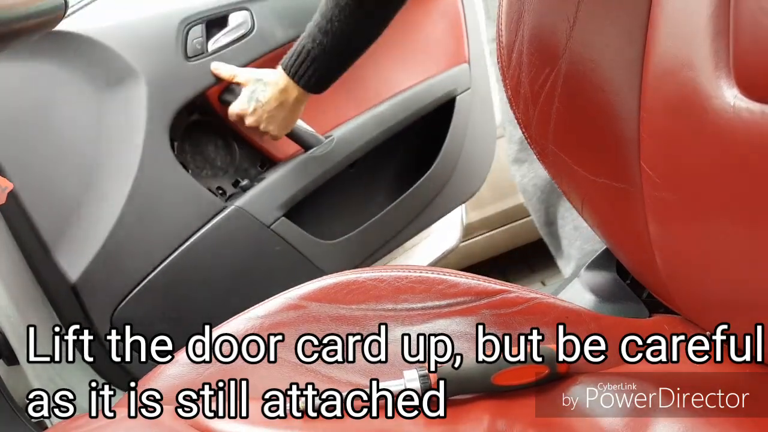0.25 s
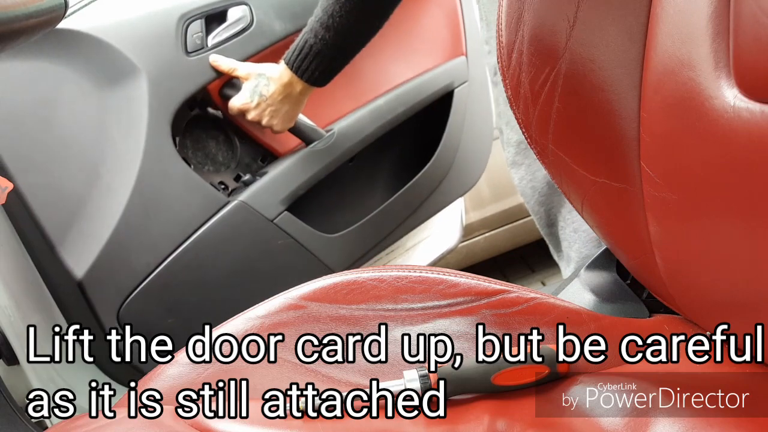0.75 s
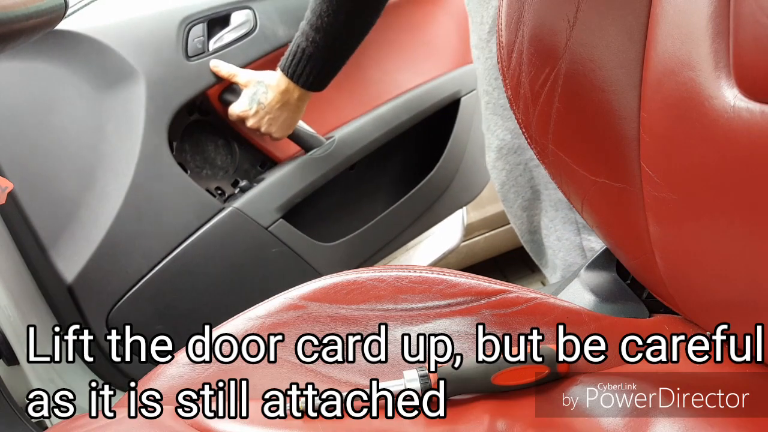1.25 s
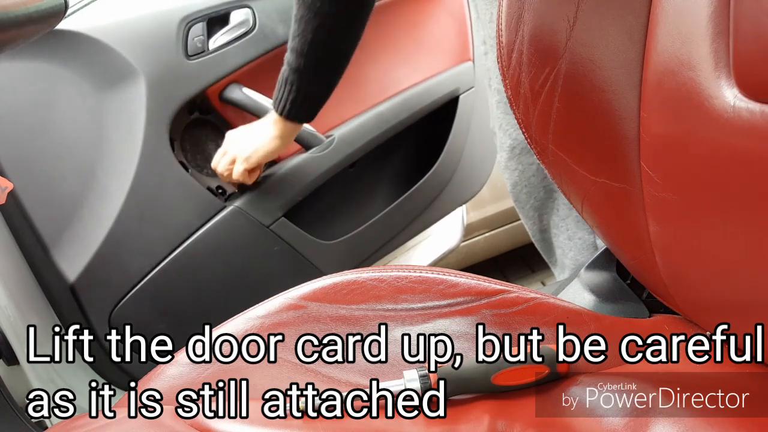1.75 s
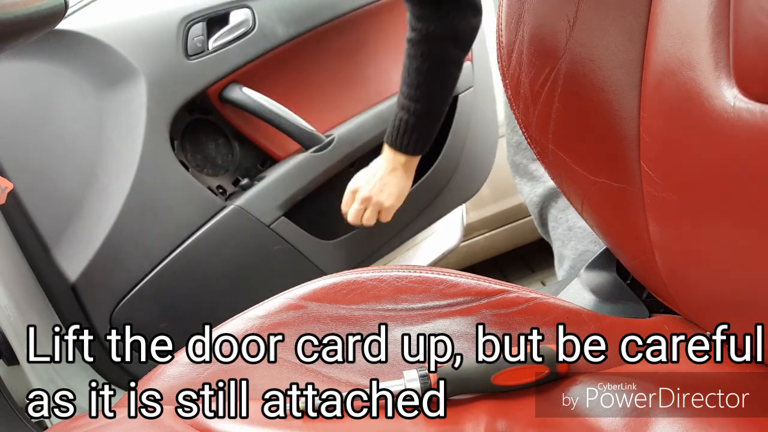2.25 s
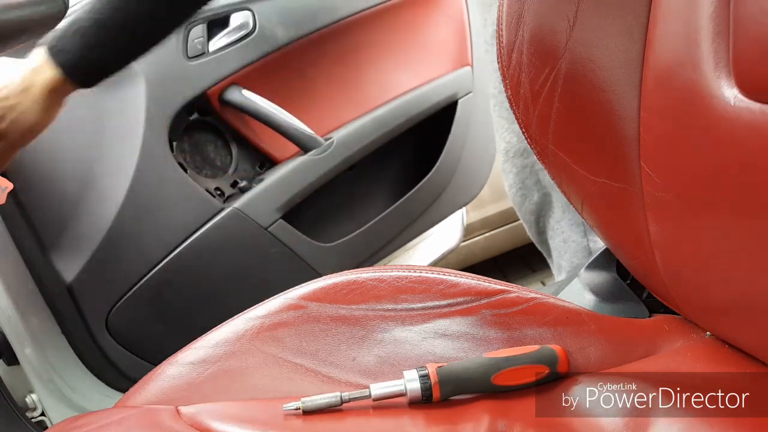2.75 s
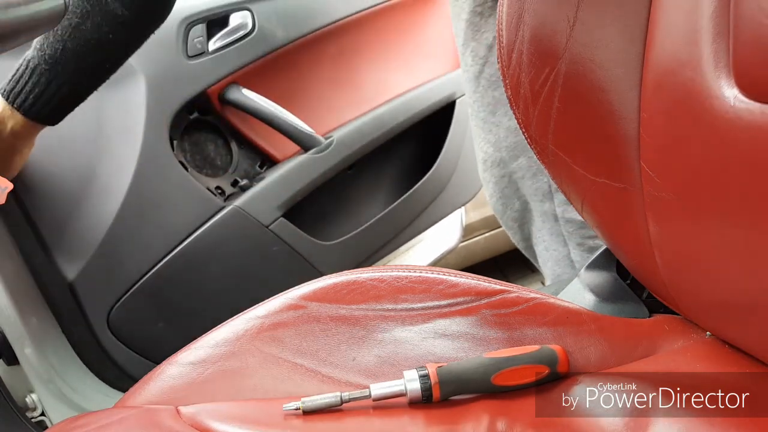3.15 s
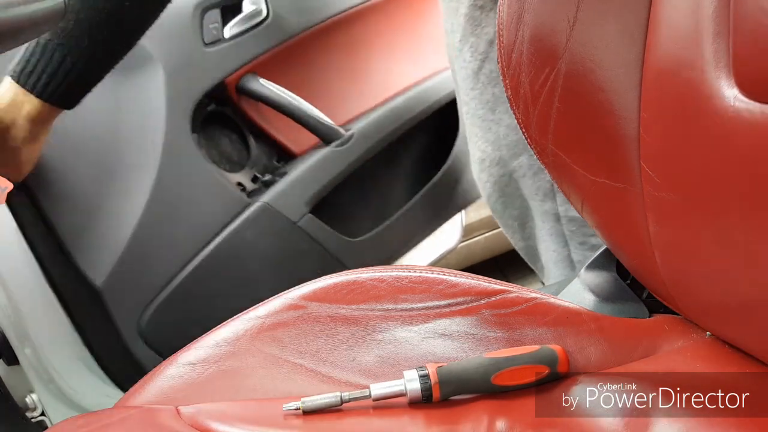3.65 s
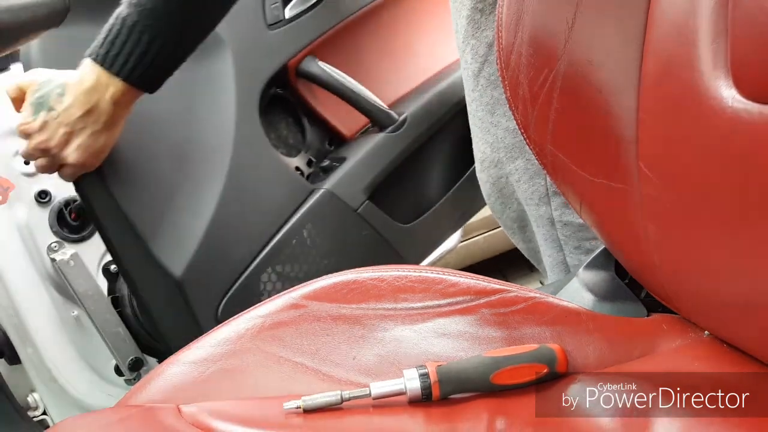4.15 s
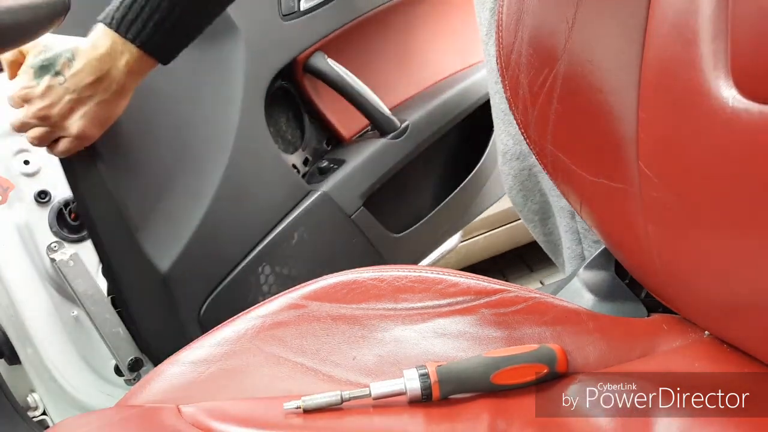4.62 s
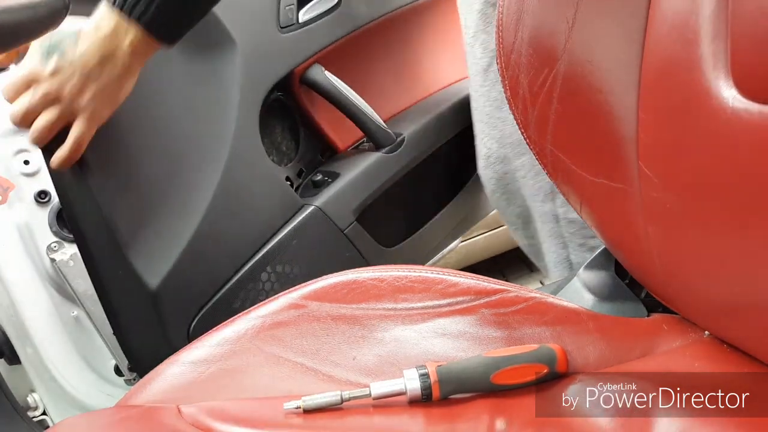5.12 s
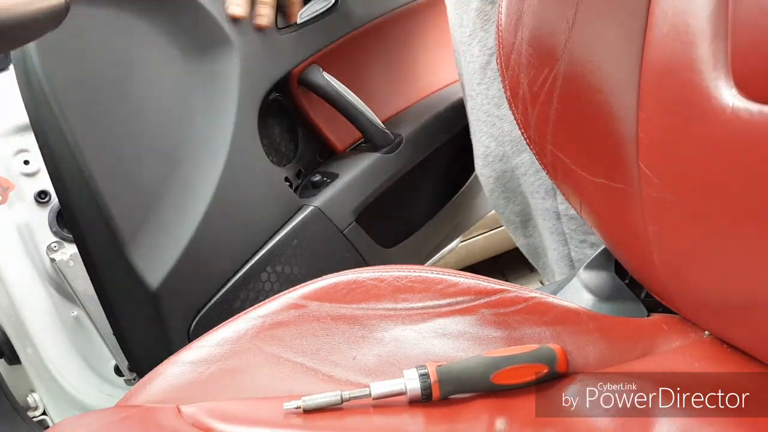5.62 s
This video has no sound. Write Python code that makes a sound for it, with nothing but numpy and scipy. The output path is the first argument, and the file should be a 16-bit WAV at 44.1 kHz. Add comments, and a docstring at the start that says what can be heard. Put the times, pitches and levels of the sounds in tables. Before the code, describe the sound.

Inside a car, a plastic door trim is worked free with busy clattering knocks, creaks and door thuds, then soft rubbing.

```python
"""Door card removal

A plastic door card is worked loose from a car door and lifted away, heard from the seat in the open cabin.
Clips snap and ping, edges knock and the hollow card rings: struck decaying modes with bursts of noise.
The steel door thuds in its lowest modes and sways as a low rumble; plastic creaks by stick-slip clicks.
A hand rubs the trim and distant road noise drifts in (banded noise); a faint narrow hiss comes late."""
import sys
import numpy as np
from scipy import signal
from scipy.fft import rfft, irfft
from scipy.io import wavfile

SR = 44100
rng = np.random.default_rng(int(sys.argv[2]) if len(sys.argv) > 2 else 0)


def elevation(decibels):
    """Turn decibel levels (scalar or array-like) into linear amplitude ratios."""
    levels = np.asarray(decibels, float)
    return 10 ** (levels / 20)


def store_pcm(level_fs):
    """Save levels as 16-bit WAV."""
    pcm = np.round(np.clip(level_fs, -1, 1) * 32767).astype(np.int16)
    wavfile.write(sys.argv[1], SR, np.atleast_2d(pcm).T)


N = 259295   # samples

# Blows on the card. Each row: start in seconds, card level in dB, card pitch in Hz, knock level in dB,
# snap level in dB.
BLOWS = [(0.009, -26.5, 360, -39.5, -85.5), (0.088, -15.5, 433, -16.5, -21.5),
         (0.101, -18.5, 476, -45, -57.5), (0.111, -31, 443, -25, -46.5), (0.17, -22, 423, -40, -44.5),
         (0.316, -39, 450, -49, -71), (0.408, -26, 436, -36, -39.5), (0.441, -18, 550, -21.5, -29.5),
         (0.46, -16.5, 576, -32, -45), (0.474, -19.5, 390, -32, -51), (0.538, -23, 460, -33.5, -30),
         (0.559, -21.5, 480, -35.5, -44.5), (0.579, -52, 455, -33.5, -45), (0.599, -29, 622, -27.5, -41),
         (0.708, -28.5, 565, -37, -44.5), (0.767, -41.5, 450, -44.5, -73), (0.852, -29.5, 418, -45, -56),
         (0.968, -46, 622, -45, -75.5), (1.004, -36, 1030, -23.5, -43.5), (1.028, -21.5, 880, -26, -28),
         (1.046, -18.5, 523, -21.5, -23), (1.068, -17, 443, -31.5, -34.5), (1.138, -42, 870, -46, -51.5),
         (1.21, -47, 460, -51, -59), (1.23, -27, 900, -41, -49.5), (1.272, -20, 686, -32.5, -41),
         (1.295, -29, 420, -34.5, -40), (1.312, -32.5, 650, -47, -55), (1.368, -25.5, 430, -20.5, -32),
         (1.472, -36, 607, -56, -87), (1.654, -46, 613, -74.5, -86), (1.913, -61, 1013, -54.5, -52),
         (1.934, -49, 394, -76, -80), (1.962, -50, 999, -53, -61), (1.977, -34, 570, -41, -52),
         (2.265, -42.5, 614, -69.5, -84), (2.389, -36, 436, -38, -44.5), (2.501, -28.5, 590, -51, -57.5),
         (2.507, -24, 644, -32.5, -45), (2.568, -24, 846, -26.5, -49), (2.61, -42, 310, -56, -59.5),
         (2.656, -35.5, 386, -53, -61.5), (2.706, -29, 470, -31.5, -39.5), (2.797, -37.5, 485, -48.5, -63),
         (2.844, -31, 412, -36.5, -41.5), (2.931, -36.5, 447, -37.5, -43.5),
         (3.02, -32.5, 446, -37.5, -44.5), (3.069, -38.5, 390, -43.5, -54), (3.107, -41, 372, -49, -60),
         (3.145, -37.5, 380, -39.5, -53.5), (3.285, -43.5, 417, -44.5, -57), (3.325, -48.5, 440, -63, -86),
         (3.401, -31.5, 592, -46.5, -62.5), (3.45, -8.5, 448, -26.5, -32), (3.478, -38, 436, -37.5, -47.5),
         (3.536, -22.5, 250, -46, -64), (3.567, -20.5, 379, -41.5, -63), (3.882, -46.5, 456, -68, -74),
         (4.043, -44.5, 640, -64, -77), (4.276, -40, 610, -58, -71), (4.769, -47.5, 290, -47.5, -56),
         (4.902, -41, 540, -54.5, -56), (4.928, -43, 493, -53.5, -51), (5.207, -47, 410, -62, -65),
         (5.402, -64, 374, -56, -55), (5.489, -47.5, 840, -60, -90)]
# Modes of door, card and clips. Each row: frequency in Hz, level in dB, t60 in seconds.
MODES = [(105.4, 2.5, 0.43), (116, 3.5, 0.18), (179.3, 2.5, 0.048), (215.3, -3, 0.15), (250, -10.5, 0.11),
         (288.7, -4, 0.072), (317.5, -7.5, 0.029), (366, -13.5, 0.16), (409, -6, .08), (437.4, 1, 0.068),
         (491.4, -8, 0.11), (519.3, -10.5, 0.089), (578.6, 3.5, 0.037), (622, 1, 0.052), (735, -8.5, 0.028),
         (780, -5.5, 0.037), (873, -0.5, 0.038), (956, -15, 0.068), (960, -5, .03), (1296, -3, 0.023),
         (1602, -1, 0.018), (1984, 0.5, 0.018), (2685, -1.5, 0.01), (4030, -10.5, 0.013),
         (5140, -3.5, 0.0058), (7810, -1, 0.0088)]
# Borders in Hz: door below the first, then card, knock and snap.
PART_BORDERS_HZ = [150, 1030, 3700, 20000]


def rms_one(x):
    """Scale to unit rms."""
    return x / np.sqrt(np.mean(x ** 2) + 1e-20)


def at_hz(points, hz):
    """Read a table on a log-frequency axis."""
    point_hz, value = np.transpose(points)
    return np.interp(np.log(hz), np.log(point_hz + 1e-9), value)


def drift(rate_hz):
    """Slow random wander of unit rms: low-passed noise made at every 40th sample."""
    pole = np.exp(-80 * np.pi * rate_hz / SR)
    white = rng.standard_normal(N // 40 + 2002)
    slow = signal.lfilter([1], [1, -2 * pole, pole * pole], white)[2000:]   # settled part
    return np.interp(np.arange(N) / 40, np.arange(len(slow)), rms_one(slow))


def banded_noise(spectrum, patchy_db, alike_more):
    """Third-octave bands of stereo noise, each with its own level, flicker and left-right likeness."""
    # Each row: frequency in Hz, left-right likeness from -1 to 1 (before alike_more).
    likeness = [(60, 0.93), (180, 0.83), (550, 0.73), (1650, -0.23), (4970, -0.047), (15000, -0.32)]
    edges_hz = 22 * 2 ** np.arange(0, 9.7, 1 / 3)
    white = rng.standard_normal((2, 2, N))
    out = 0
    for k, (low, high) in enumerate(zip(edges_hz, edges_hz[1:])):
        hz = np.sqrt(low * high)
        if 2 * hz < spectrum[0][0]:   # over an octave under the lowest point
            continue
        sos = signal.butter(2, [low, high], "band", fs=SR, output="sos")
        mid, side = signal.sosfilt(sos, white[k % 2])   # neighbouring bands differ
        alike = np.clip(at_hz(likeness, hz) + alike_more, -1, 1)
        gain = elevation(at_hz(spectrum, hz) + patchy_db * drift(7.5))
        out = out + gain * (np.sqrt(1 + alike) * mid + np.sqrt(1 - alike) * side * [[1], [-1]])
    return rms_one(out)


def strokes(rows, rise_db_per_s, fall_db_per_s):
    """Each stroke swells, holds and fades; gain per sample."""
    t = np.arange(0, N, 32) / SR
    full_s, held_s, db = np.transpose(rows)[:, :, None]
    rise_db = rise_db_per_s * np.maximum(full_s - t, 0)
    fall_db = fall_db_per_s * np.maximum(t - full_s - np.abs(held_s), 0)
    gain = elevation(db - rise_db - fall_db).sum(axis=0)
    return np.interp(np.arange(N) / SR, t, gain)


def rub():
    """A hand on the trim: friction noise that swells with each stroke."""
    # Each row: full from in seconds, held for in seconds, level in dB.
    rub_strokes = [(0.0, 0.0062, -43), (0.29, 0.049, -54), (0.49, .04, -46.5), (0.63, 0.1, -62.5),
                   (0.82, .05, -51.5), (1.035, .05, -41), (1.1, 0.036, -56), (1.25, 0.055, -43),
                   (1.5, 0.042, -64.5), (1.918, 0.00594, -71), (1.965, .065, -53), (3.14, 0.078, -57),
                   (3.92, 0.93, -62.5), (4.87, 0.12, -60), (5.07, 0.016, -56.5), (5.2, 0.028, -50),
                   (5.25, .05, -55.5), (5.31, .04, -50), (5.37, 0.027, -55.5), (5.51, 0.041, -45),
                   (5.59, 0.11, -51), (5.74, .07, -48), (5.83, .05, -53)]
    # Each row: frequency in Hz, relative density in dB per Hz.
    colour = [(760, -10.5), (1300, -5.5), (1940, -5), (3310, -11), (4080, -12.5), (12200, -21),
              (15000, -10.5), (16000, -30)]
    friction = banded_noise(colour, patchy_db=2.0, alike_more=0.18)
    return strokes(rub_strokes, rise_db_per_s=347.5, fall_db_per_s=389) * friction


def road():
    """Distant road noise through the open door: steady broadband noise, strongest below 1 kHz."""
    # Each row: frequency in Hz, relative density in dB per Hz.
    colour = [(18, -39.5), (30, -12), (84, -2), (239, -5), (295, -3), (336, -8.5), (473, -1), (760, -5),
              (962, -0.5), (1350, -13), (1720, -12.5), (3220, -31), (6210, -34), (14400, -36.5),
              (16000, -33.5)]
    level_db = -49
    return elevation(level_db) * banded_noise(colour, patchy_db=0.18, alike_more=0)


def sway():
    """The door rocks on its hinges when leant on: a low lumpy rumble."""
    # Each row: full from in seconds, held for in seconds, level in dB.
    leans = [(0.0, 0.1, -30), (0.42, 0.22, -44), (1.27, 0.062, -46), (2.62, 0.33, -60), (3.26, 0.033, -59),
             (3.55, 0.055, -39.5), (4.4, .05, -57.5), (4.9, .03, -52), (5.42, 0.12, -60.5),
             (5.82, .03, -59)]
    rest_db = -75.5
    gain = elevation(rest_db) + strokes(leans, rise_db_per_s=117.5, fall_db_per_s=68)
    sos = signal.butter(2, [22, 65], "band", fs=SR, output="sos")
    rumble = signal.sosfilt(sos, rng.standard_normal(N + SR))[SR:]   # filter settled
    return gain * rms_one(rumble)


def ringing(size):
    """One decaying sine a mode."""
    hz, db, t60_s = np.transpose(MODES)[:, :, None]
    t = np.arange(size) / SR
    return elevation(db - 60 * t / t60_s) * np.sin(2 * np.pi * hz * t)


def creak(typical_slips_per_s=580.0, off_middle_db_per_octave=-4.0):
    """Plastic under load: uneven stick-slip clicks pass into the card's hollow modes."""
    # Each row: full from in seconds, held for in seconds, level in dB.
    loads = [(0.005, 0.027, -31.5), (0.315, 0.088, -45.5), (0.635, 0.11, -44), (0.792, 0.042, -32),
             (0.872, 0.028, -36), (1.09, 0.014, -36), (1.165, 0.035, -51), (1.282, 0.019, -35),
             (1.465, 0.017, -41), (2.58, 0.0083, -42), (2.66, 0.0057, -42.5), (3.04, 0.015, -57),
             (3.15, 0.085, -39), (3.472, 0.013, -38), (3.56, 0.017, -24), (3.62, 0.034, -60)]
    chance = rng.random(N)
    slips_per_s = typical_slips_per_s * elevation(4 * drift(25))
    slips = (chance < slips_per_s / SR) * rng.standard_normal(N)
    hz = np.array(MODES)[:, 0]
    reach = elevation(off_middle_db_per_octave * np.abs(np.log2(hz / 500)))   # strongest near the middle modes
    reach *= (-1) ** np.arange(len(hz)) * (hz > PART_BORDERS_HZ[0])   # alternating sign, no door modes
    hollow = signal.fftconvolve(slips, reach @ ringing(size=8192))[:N]
    return strokes(loads, rise_db_per_s=591, fall_db_per_s=592) * rms_one(hollow)


def crack(low_hz, high_hz, db, t60_s, chatter_ms, size):
    """Thin plastic has too many high modes to count: dying noise in a band, with a sharp first tick."""
    tick_db, tick_ms, side_db = 4.5, 0.87, -1
    t60_per_chatter = 1.1   # seconds of t60 added for each second of chatter
    t = np.arange(size) / SR
    fade = elevation(db - 60 * t / (t60_s + t60_per_chatter * chatter_ms / 1000))
    fade *= 1 + elevation(tick_db) * np.exp(-1000 * t / tick_ms)
    mid, side = rng.standard_normal((2, size)) * fade
    stereo = mid + elevation(side_db) * side * [[1], [-1]]   # partly unlike on the two sides
    sos = signal.butter(3, [low_hz, high_hz], "band", fs=SR, output="sos")
    return signal.sosfilt(sos, stereo) * np.sqrt(SR / (high_hz - low_hz))


def off_tune(hz, centre_hz):
    """Detuning of a resonance, zero at its centre."""
    return hz / centre_hz - centre_hz / hz


def blows(touch_db=-15.0, uneven_db=4.5, off_pitch_db_per_octave=-3.5, knock_sharpness=4.1,
          card_sharpness=1.23):
    """A first contact and a dying chatter of smaller ones strike every mode, unevenly anew each blow."""
    # Noise of knock, then snap. Each row: low edge in Hz, high edge in Hz, level in dB,
    # t60 in seconds without chatter.
    crack_bands = [(833.3, 4700, -4, 0.042), (3700, 12700, -14, 0.027)]
    usual_knock_hz, knock_spread_octaves = 1900, 0.43
    usual_chatter_ms, chatter_spread_db = 4.37, 5
    soft_ms_per_db = 0.37   # landing time constant for each dB that the knock lies under the card
    size = 16384
    out = np.zeros((2, N + size))
    t = np.arange(size) / SR
    modes, hz = rfft(ringing(size=size // 2), size), np.array(MODES)[:, 0]
    in_part = np.digitize(hz, PART_BORDERS_HZ) == np.arange(1, 4)[:, None]   # card, knock, snap
    bins_hz = np.maximum(np.fft.rfftfreq(size, 1 / SR), 1)
    for start_s, card_db, card_hz, knock_db, snap_db in BLOWS:
        # each blow lands on another piece
        knock_hz = usual_knock_hz * 2 ** (knock_spread_octaves * rng.standard_normal())
        chatter_ms = usual_chatter_ms * elevation(chatter_spread_db * rng.standard_normal())

        touches = rng.standard_normal(size) * (rng.random(size) < .15) * elevation(touch_db)
        touches *= np.exp(-1000 * t / max(chatter_ms, .2)) * (t < .1)
        touches[0] = 1
        contact = rfft(touches)

        # all modes in step: the peak comes at once
        strength = elevation(uneven_db * rng.standard_normal(len(hz)))
        # the struck spot favours card modes near one pitch
        off_octaves = np.abs(np.log2(hz / card_hz)) * (hz < PART_BORDERS_HZ[1])
        strength *= elevation(off_pitch_db_per_octave * off_octaves)
        card, knock, snap = [contact * (strength[part] @ modes[part]) for part in in_part]
        knock_crack, snap_crack = [rfft(crack(*band, chatter_ms, size=size // 2), size)
                                   for band in crack_bands]
        snap = snap + snap_crack
        # the struck piece's own broad ring
        knock_ring = 1 + 2.7 / (1 + 1j * knock_sharpness * off_tune(bins_hz, knock_hz))
        knock = (knock + knock_crack) * knock_ring
        # the card swings up over a cycle or two
        card = card / (1 + 1j * card_sharpness * off_tune(bins_hz, card_hz))

        # dull blows land softly
        soft_ms = max(soft_ms_per_db * (card_db - knock_db), .05)
        landing = 1.5 - np.exp(-1000 * t / soft_ms)
        at = round(start_s * SR)
        for part, db in ((card, card_db), (knock, knock_db), (snap, snap_db)):
            sound = landing * irfft(part, size)
            onset_rms = np.sqrt(np.mean(sound[..., :900] ** 2))
            out[:, at:at + size] += elevation(db) * sound / onset_rms
    # a thin card radiates no deep bass
    return signal.sosfilt(signal.butter(2, 170, "high", fs=SR, output="sos"), out[:, :N])


def thuds():
    """Blows shake the heavy steel door, which swings up slowly in its lowest modes."""
    # Each row: start in seconds, level in dB.
    heavy = [(0.009, -35.5), (0.084, -19), (0.169, -32.5), (0.404, -34), (0.439, -14), (0.46, -13),
             (0.473, -19), (1.229, -47), (1.29, -34.5), (3.449, -30), (3.482, -28.5), (3.536, -32.5),
             (3.569, -26)]
    light_db, light_follows = -36.5, 0.32   # every blow nudges it: level, and share of the card's dB
    right_lag_s = .0003
    light = [(start_s, light_db + light_follows * card_db) for start_s, card_db, *_ in BLOWS]
    pushes = np.zeros(N)
    for start_s, db in heavy + light:
        pushes[round(start_s * SR)] += elevation(db)
    door = ringing(size=16384)[np.array(MODES)[:, 0] < PART_BORDERS_HZ[0]].sum(axis=0)
    door = signal.sosfilt(signal.butter(2, [75, 150], "band", fs=SR, output="sos"), door)
    thud = signal.fftconvolve(pushes, door / np.abs(door).max())[:N]
    return np.array([thud, np.roll(thud, round(right_lag_s * SR))]) * elevation([[-.4], [.4]])


def pings():
    """Clips that spring free: a close pair of dying tones each, at a pitch of their own."""
    # Each row: start in seconds, frequency of the lower tone in Hz, level of that tone in dB.
    clips = [(0.088, 7700, -24), (0.538, 5000, -37), (0.769, 2320, -47), (0.969, 2010, -42.5),
             (1.006, 1900, -29.5), (1.046, 2750, -24.5), (1.37, 1800, -27), (2.506, 2800, -22),
             (2.797, 3700, -45), (3.451, 4860, -19)]
    cycles_to_60_db_down = 78
    out, t = np.zeros(N + 4096), np.arange(4096) / SR
    for start_s, hz, db in clips:
        pair = np.sin(2 * np.pi * hz * t) + 0.72 * np.sin(2 * np.pi * 1.06 * hz * t)
        fade = elevation(db - 60 * t * hz / cycles_to_60_db_down)
        out[round(start_s * SR):][:4096] += fade * pair
    return out[:N]


def thin_hiss(half_width_hz=190.0):
    """A faint narrow band of noise carried on a gliding pitch."""
    # Each row: time in seconds, frequency in Hz, level in dB.
    glide = [(3.8, 3920, -89), (3.899, 3900, -81), (4.1, 4150, -72), (4.3, 4200, -83), (4.45, 4170, -88)]
    s, hz, db = np.transpose(glide)
    t = np.arange(N) / SR
    sos = signal.butter(2, half_width_hz, fs=SR, output="sos")
    band = signal.sosfilt(sos, rng.standard_normal((2, N)))
    carrier = np.sin(2 * np.pi * np.cumsum(np.interp(t, s, hz)) / SR)
    return elevation(np.interp(t, s, db, left=-200, right=-200)) * rms_one(band * carrier)


def cabin(x):
    """Direct sound, a little earlier on the left, and dense short reflections that differ between sides."""
    t60_s, echo_db, echo_low_hz = 0.076, -3, 640
    left_db, right_lag_s = -0.5, 0.00019
    t = np.arange(round(.25 * SR)) / SR
    echoes = rng.standard_normal((2, len(t))) * elevation(-60 * t / t60_s) * np.clip(t / 0.0032, 0, 1)
    echoes = signal.sosfilt(signal.butter(2, echo_low_hz, "high", fs=SR, output="sos"), echoes)
    echoes *= elevation(echo_db) / np.sqrt(np.sum(echoes ** 2, axis=1, keepdims=True))
    late = np.concatenate([np.zeros(round(right_lag_s * SR)), x[1]])[:N]
    direct = np.array([elevation(left_db) * x[0], late])
    left, right = direct + signal.fftconvolve(x, echoes, axes=1)[:, :N]
    # the right side is shaded from the highest treble
    shaded = signal.sosfilt(signal.butter(2, 12000, fs=SR, output="sos"), right)
    return np.array([left, shaded])


def scene():
    """Door card in the cabin, with door, hand, hiss and road around it."""
    around = rub() + road()
    card = cabin(blows() + creak() + pings())
    return card + thuds() + sway() + thin_hiss() + around


def top_cut(x):
    """Nothing passes above the cut-off."""
    return signal.sosfilt(signal.butter(12, 16500, fs=SR, output="sos"), x)


def record(dry):
    """The microphone loses the deepest bass and the top and rounds peaks near full scale."""
    dry = signal.sosfilt(signal.butter(2, 25, "high", fs=SR, output="sos"), dry)
    dry = signal.sosfilt(signal.cheby2(10, 40, 16300, fs=SR, output="sos"), dry)   # 40 dB down at 16300 Hz
    mix = 1.37 * np.tanh(dry / 1.643)
    return top_cut(mix)


dry = scene()
out = record(dry)
store_pcm(out)
```